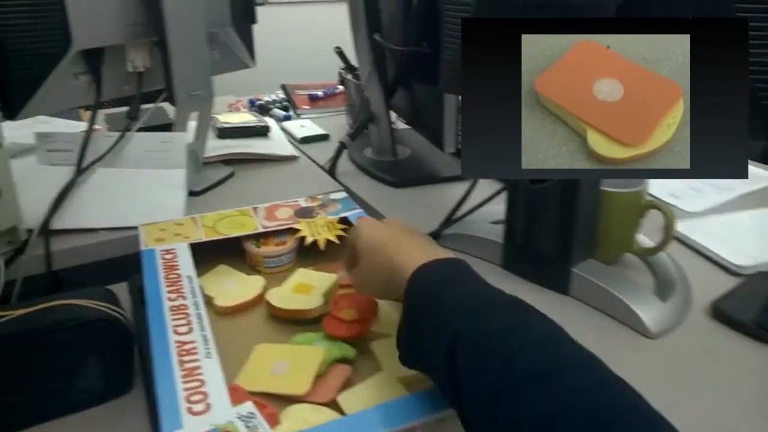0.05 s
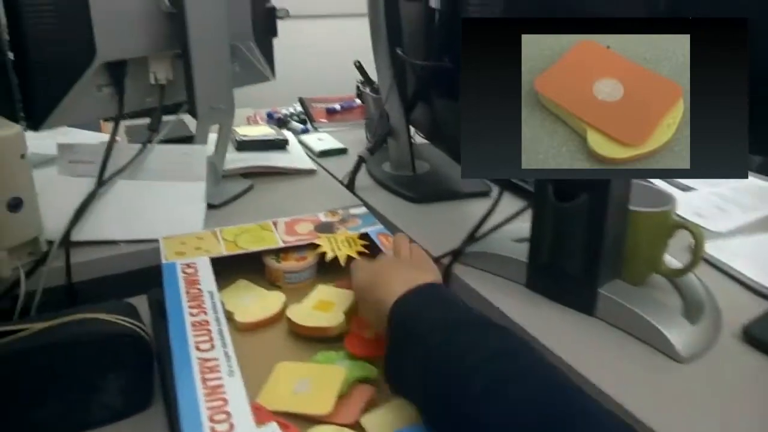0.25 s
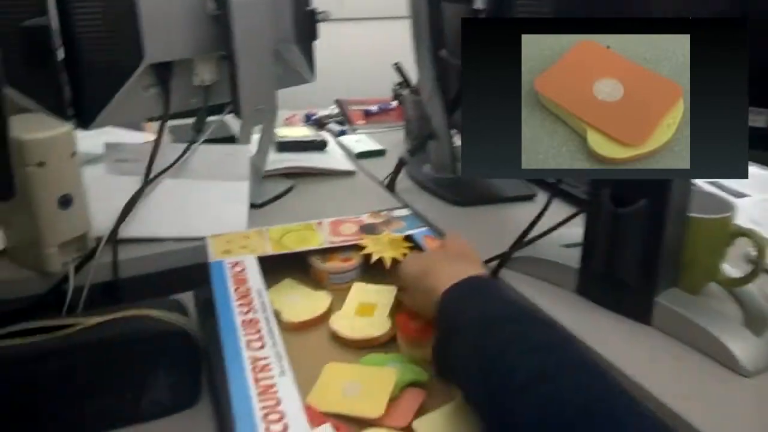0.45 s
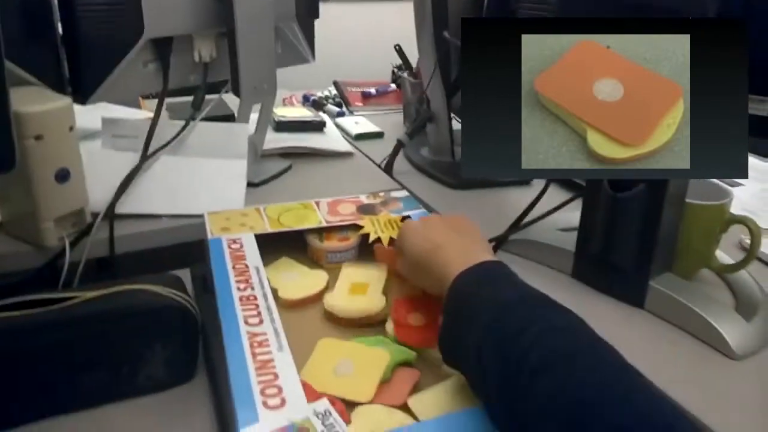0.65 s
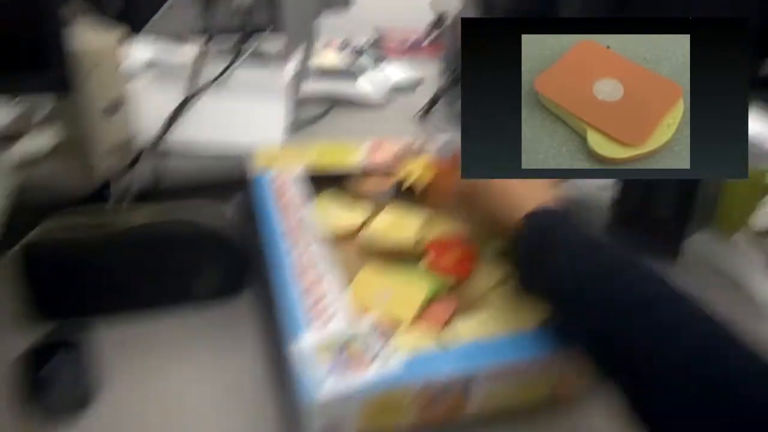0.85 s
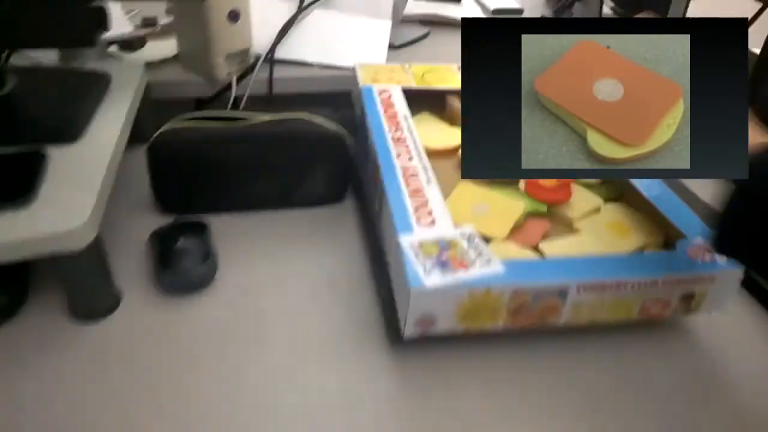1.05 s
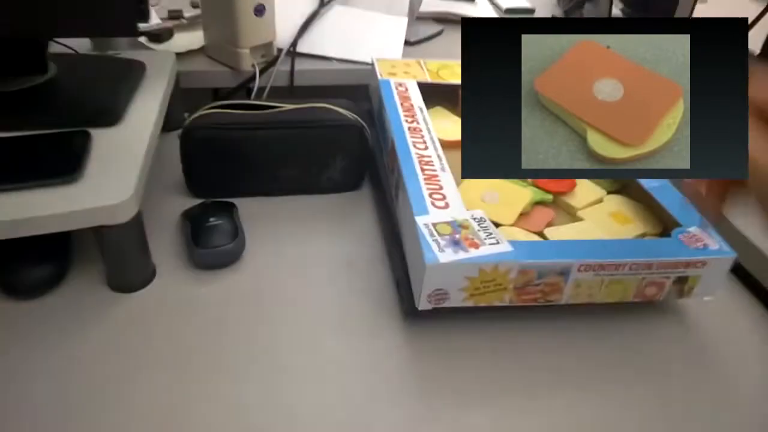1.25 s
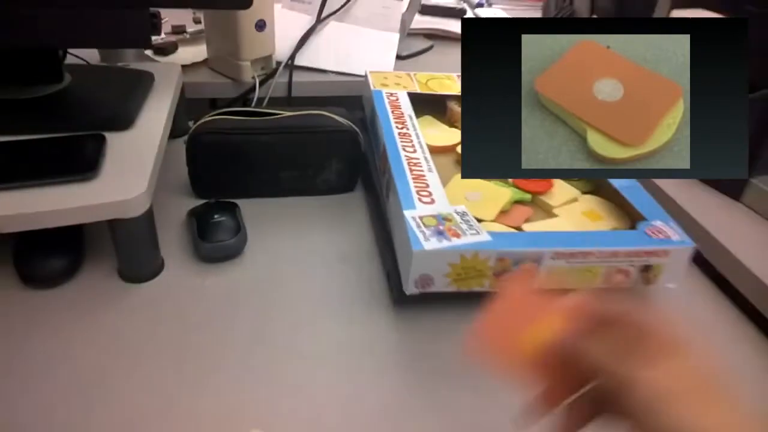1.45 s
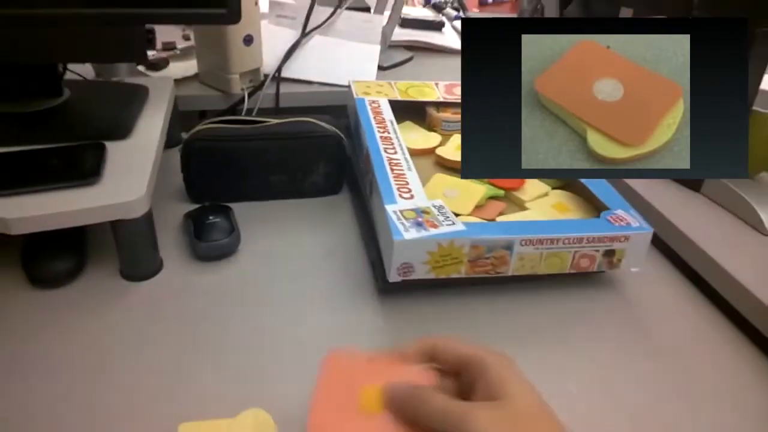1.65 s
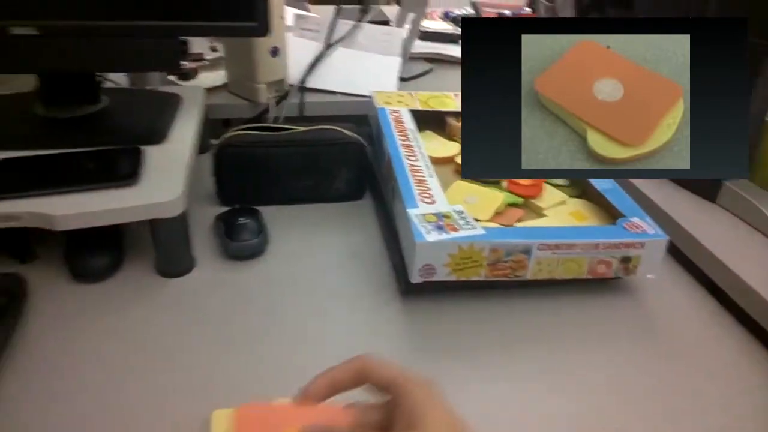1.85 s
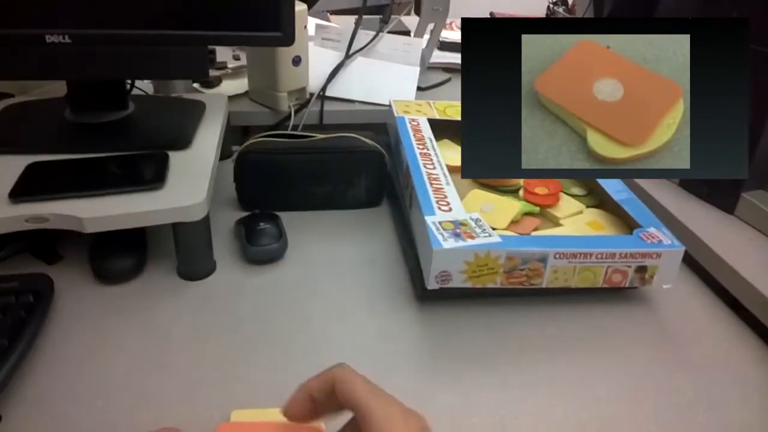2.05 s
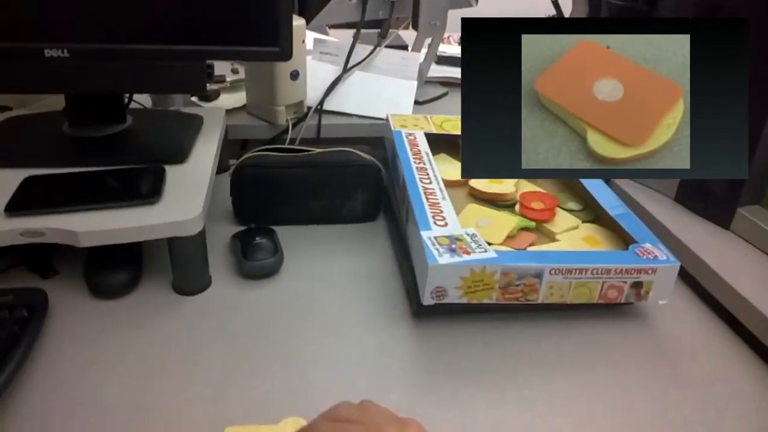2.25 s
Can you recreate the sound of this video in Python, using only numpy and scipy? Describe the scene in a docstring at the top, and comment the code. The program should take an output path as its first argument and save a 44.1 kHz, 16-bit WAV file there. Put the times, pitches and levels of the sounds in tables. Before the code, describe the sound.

A brief rattle of small plastic toy pieces in a box, then a few faint clicks

```python
"""Toy food pieces in a cardboard box

A hand rummages among hollow plastic toys on an office desk: they knock, crack, scrape and ring.
Knocks mix short noise bursts with fading tones; scrapes are grainy noise; the box thumps dully.
One piece is then set on another with light clicks and a short slide, made of thin filtered noise.
Low room rumble and steady hiss, both filtered noise, lie under it all."""
import sys
import numpy as np
from scipy import signal
from scipy.fft import rfft, irfft
from scipy.io import wavfile
from scipy.ndimage import uniform_filter1d

SR = 44100
rng = np.random.default_rng(int(sys.argv[2]) if len(sys.argv) > 2 else 0)


def transcribe(u):
    """Save the signal u as a 16-bit wav file named by the first command-line argument.

    u: samples, shape (n,) or (channels, n), limited to [-1, 1]; the rate is SR.
    q: integer samples, one column per channel.
    """
    v = np.clip(np.atleast_2d(u).T, -1, 1)
    q = np.round(v * 32767).astype(np.int16)
    wavfile.write(sys.argv[1], SR, q)


N = 101429  # length in samples

# Tone colour of bright plastic cracks and scrapes.
# Each row: frequency in Hz, relative level in dB.
CRACK_COLOUR = [(1000, -19), (2800, 8), (3400, -9), (4000, 5), (5500, 1.5), (8000, -2), (10500, -7),
                (12000, -13), (15000, -16)]
KNOCK_RISE_S, CRACK_RISE_S, CRACK_HOLD_S = 0.0015, 0.00039, 0.003
# chance peaks and dips in the spectrum: largest size, and spacing
FACET_DB, FACET_HZ = 9, 261.9


def amp(db):
    """Turns decibels into a gain."""
    return 10 ** (np.asarray(db) / 20)


def unit(x):
    """Scales a sound to an average (rms) level of 1."""
    return x / np.sqrt(np.mean(x ** 2) + 1e-20)


def read(points, hz):
    """Reads between the rows of a table, along a log-frequency axis."""
    f, value = np.transpose(points)
    return np.interp(np.log(hz + 1), np.log(f + 1), value)


def add(mix, start_s, sound):
    """Mixes a sound in at its start time, cutting it off at the end of the mix."""
    part = mix[round(start_s * SR):][:len(sound)]
    part += sound[:len(part)]


def colour(x, points, pitch_hz=1000, lift_db=0, width=1, size=4096):
    """Filters to a table's spectrum plus one broad resonance, with no sound before the blow."""
    hz = abs(np.fft.fftfreq(size, 1 / SR))
    resonance_db = lift_db / (1 + ((hz / pitch_hz - 1) / width) ** 2)
    log_gain = np.log(amp(read(points, hz) + resonance_db))
    # the Hilbert transform gives the phase that puts the energy first
    spectrum = np.exp(np.conj(signal.hilbert(log_gain)))
    taps = np.fft.ifft(spectrum).real[:size // 2]
    return signal.fftconvolve(x, taps / np.linalg.norm(taps))[:len(x)]


def facets(x, depth_db, width_hz):
    """Every point of a piece sounds different: chance peaks and dips in the spectrum."""
    knots = np.arange(0, SR / 2, width_hz)
    chance = (2 * rng.random(size=4096) - 1)[:len(knots)]
    return colour(x, np.column_stack([knots, depth_db * chance]))


def chatter(rise, hold, t60, size=8192, count=3):
    """A dense noise burst for many tiny impacts, shaped by a rise, hold and decay (all in seconds)."""
    t = np.arange(size) / SR
    shape = np.minimum(t / rise, 1) * amp(-60 * np.maximum(t - hold, 0) / t60)
    x = rng.standard_normal(size)
    for _ in range(count):
        # even out the spectrum of the shaped noise
        z = rfft(x * shape)
        x = irfft(z / (abs(z) + 1e-9)) * (shape > 0)
    x = x * np.sqrt(shape)
    return unit(x) * np.sqrt(np.mean(shape ** 2))


def pieces():
    """Each contact gives a bright crack, a hollow pitched knock with its rattle, and the shells' ring."""
    # Piece against piece. Each row: start in seconds, knock strength in dB, knock pitch in Hz,
    # crack strength in dB, crack pitch in Hz.
    contacts = [ (.225, -30, 1060, -47, 5040), (.2382, -28.5, 1400, -36.5, 4320),
                (.274, -41.5, 1260, -48, 6170), (.286, -34, 1186, -45.5, 4290),
                (.306, -37, 1120, -43, 4130), (.3175, -32, 2120, -38.5, 5200),
                (.3207, -26, 1286, -38, 4470), (.331, -31, 1130, -48.5, 4440),
                (.3573, -24.5, 1500, -38, 10100), (.364, -38, 1340, -43.5, 5620),
                (.384, -35, 1330, -50, 4170), (.408, -37, 1560, -66.5, 6900),
                (0.4362, -37, 1560, -41, 9340), (.471, -39, 1020, -51, 5394),
                (.5043, -29.5, 1250, -39, 7020), (.514, -19, 1404, -26, 7460),
                (.531, -19.5, 1420, -36, 5550), (.548, -21, 1330, -33, 8100),
                (.556, -24.5, 1514, -43.5, 6025), (.566, -26.5, 1500, -33.5, 9100),
                (.587, -17.5, 1119, -23, 7640), (.5918, -17.5, 2285, -30, 4530),
                (.599, -23.5, 1057, -45.5, 4200), (.6078, -17.5, 1107, -23, 7940),
                (.617, -20.5, 1157, -28.5, 7744), (.629, -22.5, 1150, -33.5, 5300),
                (.659, -28, 1023, -39, 5500), (.664, -20.5, 1307, -23.5, 5115),
                (.6735, -18.5, 1177, -22, 9660), (.684, -32, 1065, -46.5, 7530),
                (.705, -24, 1095, -46, 4314), (.712, -30, 1196, -46.5, 7800),
                (.718, -27, 2228, -45.5, 4040), (.754, -54, 1250, -84, 4300),
                (.777, -47, 1198, -66.5, 4460), (.914, -59.5, 2214, -58, 2740),
                (.93, -50.5, 1233, -72, 4340), (1.066, -66, 1220, -84, 4250)]
    # Tone colour of the rattle. Each row: frequency in Hz, relative level in dB.
    knock_colour = [(60, -35), (250, -22), (450, -8), (850, -9), (1050, 3.5), (1500, -5), (1800, -5),
                    (2300, -3), (2850, -14), (3400, -30), (6000, -51)]
    tone_db, rattle_db = -3.5, -2  # relative to the knock strength
    # the crack's tone, relative to the crack: strongest at ping_hz
    ping_top_db, ping_hz, ping_db_per_octave = 3.5, 4000, -18
    # resonance at each blow's own pitch; widths are shares of that pitch
    knock_lift_db, knock_width, crack_lift_db, crack_width = 6, 0.097, 10, 0.12
    out = np.zeros(N)
    for start_s, knock_db, knock_hz, crack_db, crack_hz in contacts:
        add(out, start_s, amp(knock_db + tone_db) * wall_tone(knock_hz))

        octaves_away = abs(np.log2(crack_hz / ping_hz))
        ping_db = ping_top_db + ping_db_per_octave * octaves_away
        add(out, start_s, amp(crack_db + ping_db) * wall_tone(crack_hz))

        push = amp(knock_db) * chatter(KNOCK_RISE_S, hold=0.0046, t60=0.035)
        push = facets(push, FACET_DB, FACET_HZ / 2)
        rattle = colour(push, knock_colour, knock_hz, knock_lift_db, knock_width)
        add(out, start_s, amp(rattle_db) * rattle)

        add(out, start_s, amp(knock_db) * shell_ring(knock_hz))

        snap = amp(crack_db) * chatter(CRACK_RISE_S, CRACK_HOLD_S, t60=0.054)
        snap = facets(snap, FACET_DB, FACET_HZ)
        add(out, start_s, colour(snap, CRACK_COLOUR, crack_hz, crack_lift_db, crack_width))
    return out


def wall_tone(hz, size=2048):
    """The struck wall swings for a short time: quick swell, quick death."""
    swell_s = 0.0033  # time to reach the peak
    t = np.arange(size) / SR
    u = t / swell_s
    swell = (u * np.exp(1 - u)) ** 2
    return np.sqrt(2) * swell * np.sin(2 * np.pi * (hz * t + rng.random()))


def shell_ring(knock_hz, size=16384):
    """A hollow piece's own tones: those near the knock's pitch answer most, higher ones die sooner."""
    # Ring of the hollow pieces. Each row: frequency in Hz,
    # level in dB relative to the knock when the knock has that same pitch.
    shell_modes = [(1078, -9.5), (1215, -9.5), (1448, -16.5), (1840, -20), (2210, -7.5), (2730, -22),
                   (4320, -21.5)]
    db_per_octave = -4.5  # for each octave between mode and knock
    lowest_t60_s, t60_slope = 0.15, 0.2  # time for the lowest mode to fall 60 dB; shortening with pitch
    t = np.arange(size) / SR
    lowest_hz = shell_modes[0][0]
    ring = np.zeros(size)
    for hz, db in shell_modes:
        level = amp(db + db_per_octave * abs(np.log2(hz / knock_hz)))
        decay = amp(-60 * t / lowest_t60_s * (hz / lowest_hz) ** t60_slope)
        ring += level * decay * np.sin(2 * np.pi * (hz * t + rng.random()))
    return ring * np.minimum(t / KNOCK_RISE_S, 1)


def scrapes():
    """Friction of plastic on plastic between the knocks: noise made grainy by random level swings."""
    # Pieces scrape along each other. Each row: start in seconds, length in seconds before the fade,
    # level in dB.
    strokes = [(0.259, .17, -58), (0.506, .05, -35.5), (.59, .038, -33.5), (0.663, .045, -47.5)]
    grain_spread, fade_t60_s = 0.63, 0.14  # strength of the level swings; time to fade by 60 dB
    out, t = np.zeros(N), np.arange(N) / SR
    for start_s, length_s, db in strokes:
        swings = unit(uniform_filter1d(rng.standard_normal(N), size=60))
        grains = np.exp(grain_spread * swings)
        rise = np.clip((t - start_s) / CRACK_HOLD_S, 0, 1)
        fade = amp(-60 * np.maximum(t - start_s - length_s, 0) / fade_t60_s)
        out += amp(db) * rise * fade * unit(grains * rng.standard_normal(N))
    return colour(facets(out, FACET_DB, FACET_HZ), CRACK_COLOUR)


def box():
    """Dull thumps of the bumped cardboard: noise bursts with a resonance at each thump's pitch."""
    # Bumps of the box. Each row: start in seconds, strength in dB, pitch in Hz.
    thumps = [(0.039, -60, 1890), (.277, -44.5, 600), (.363, -35.5, 585), (.405, -40, 552),
              (.608, -36.5, 110), (.661, -32, 760)]
    # Tone colour of the cardboard. Each row: frequency in Hz, relative level in dB.
    box_colour = [(40, -11), (220, -9), (450, -2), (800, 3), (1600, -13), (9000, -57)]
    out = np.zeros(N)
    for start_s, db, hz in thumps:
        bump = chatter(rise=0.0015, hold=0.0015, t60=0.16)
        add(out, start_s, amp(db) * colour(bump, box_colour, hz, lift_db=16.5, width=0.11))
    return out


def placing():
    """Thin noise clicks and a short slide as one piece is carried and laid on another."""
    # Light clicks of the piece in the hand. Each row: start in seconds, strength in dB.
    clicks = [(.971, -68.5), (1.321, -54), (1.907, -69), (2.217, -66.5)]
    # Tone colour of clicks and slide. Each row: frequency in Hz, relative level in dB.
    click_colour = [(1500, -39.5), (2800, -33), (3800, -15), (10000, -15.5)]
    slide_s, slide_spread_s, slide_db = 1.94, 0.02, -71  # loudest moment, bell-curve spread, level
    t = np.arange(N) / SR
    swell = np.exp(-((t - slide_s) / slide_spread_s) ** 2 / 2)
    out = amp(slide_db) * swell * rng.standard_normal(N)
    for start_s, db in clicks:
        add(out, start_s, amp(db) * chatter(CRACK_RISE_S, hold=0.0032, t60=0.022))
    return colour(out, click_colour)


def room(x, size=22050):
    """A short office echo tail made of fading noise, the treble dying first."""
    # How fast the echo dies. Each row: frequency in Hz, time to fall 60 dB in seconds.
    echo_t60 = [(300, 0.23), (1200, 0.094), (9000, 0.026)]
    hz, t, z = signal.stft(rng.standard_normal(size), SR, nperseg=256)
    decay = amp(-60 * t / read(echo_t60, hz)[:, None])
    tail = signal.istft(z * decay, SR, nperseg=256)[1]
    tail = tail * np.minimum(np.arange(len(tail)) / SR / 0.018, 1)  # 18 ms rise
    return signal.fftconvolve(x, tail / np.linalg.norm(tail))[:N]


def background():
    """Low room rumble and a deeper one, both changing in level, and steady hiss: filtered noise."""
    # Tone colour of the room rumble. Each row: frequency in Hz, relative level in dB.
    rumble_colour = [(10, -13), (45, 1.5), (80, -5), (130, -3.5), (230, -5.5), (330, -13.5), (500, -28.5),
                     (1000, -47), (2500, -51)]
    # Loudness of the room rumble. Each row: time in seconds, level in dB.
    rumble_level = [(0, -56), (.87, -57), (1.0, -54), (1.7, -55.5)]
    # Loudness of the deeper rumble. Each row: time in seconds, level in dB.
    deep_level = [(0, -62), (1.2, -60.5), (1.6, -53.5)]
    # Tone colour of the microphone hiss. Each row: frequency in Hz, relative level in dB.
    hiss_colour = [(500, 15), (3500, 3.5), (14500, -2)]
    rumble_top_hz, deep_hz, deep_width_hz, hiss_db = 3000, 19, 3, -71.5
    hz, t = np.fft.rfftfreq(N, 1 / SR), np.arange(N) / SR

    def noise(spectrum):
        """Random noise with the given spectrum, at an average level of 1."""
        return unit(irfft(rfft(rng.standard_normal(N)) * spectrum, N))

    rumble = noise(amp(read(rumble_colour, hz)) / (1 + (hz / rumble_top_hz) ** 2))
    deep = noise(1 / (1 + ((hz - deep_hz) / deep_width_hz) ** 2))
    hiss = noise(amp(read(hiss_colour, hz)))
    rumble = amp(np.interp(t, *np.transpose(rumble_level))) * rumble
    deep = amp(np.interp(t, *np.transpose(deep_level))) * deep
    return rumble + deep + amp(hiss_db) * hiss


def scene():
    """The toys on the desk, with their echo in the room and the background."""
    room_db = -14
    toys = pieces() + scrapes() + box() + placing()
    return (toys + amp(room_db) * room(toys) + background())[None]


def record(dry):
    """The recorder's band limit: a filter that cuts the highest treble."""
    edge_hz = 14550
    taps = signal.firwin(161, edge_hz, window=("kaiser", 8), fs=SR)
    return signal.oaconvolve(dry, taps[None], "same")


dry = scene()
out = record(dry)
transcribe(out)
```